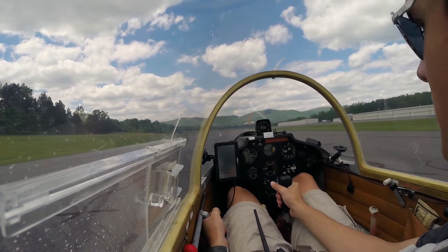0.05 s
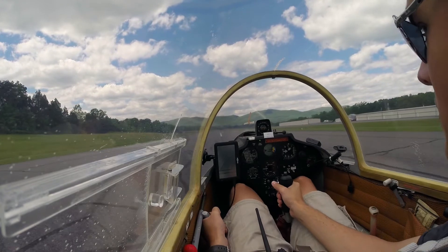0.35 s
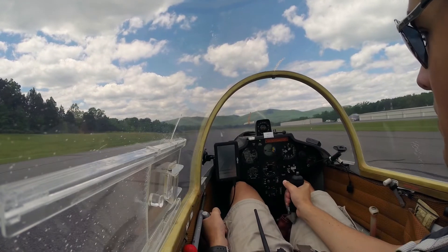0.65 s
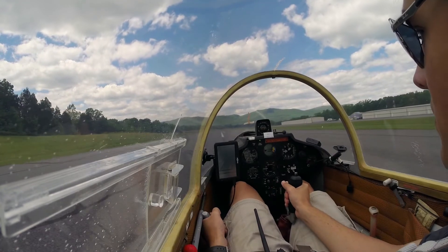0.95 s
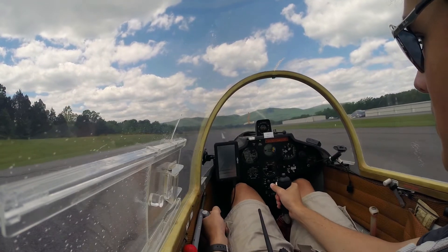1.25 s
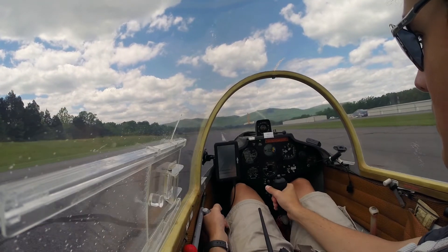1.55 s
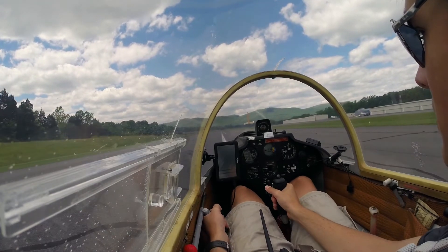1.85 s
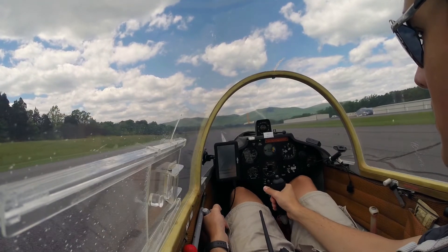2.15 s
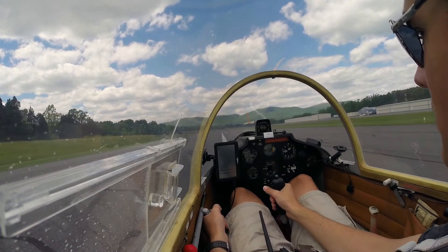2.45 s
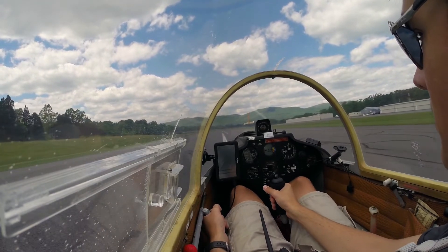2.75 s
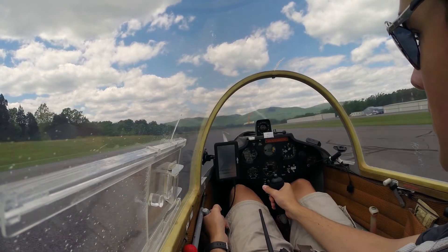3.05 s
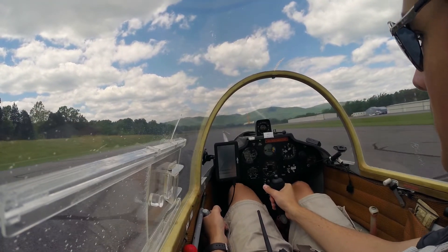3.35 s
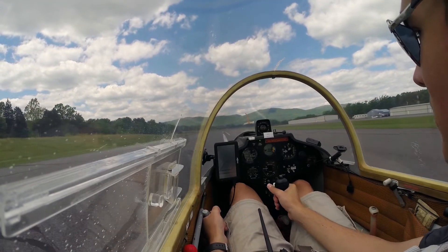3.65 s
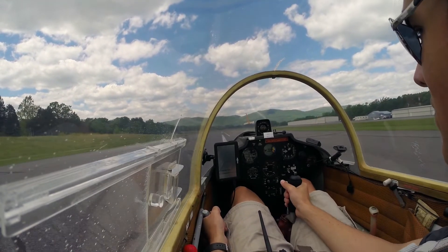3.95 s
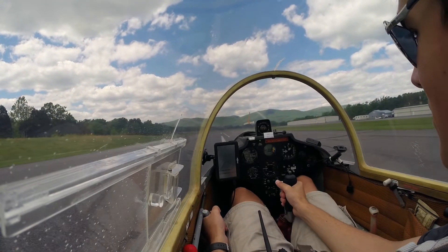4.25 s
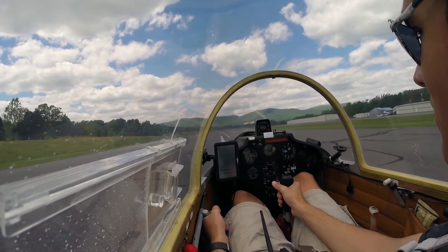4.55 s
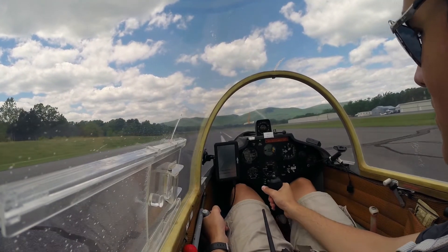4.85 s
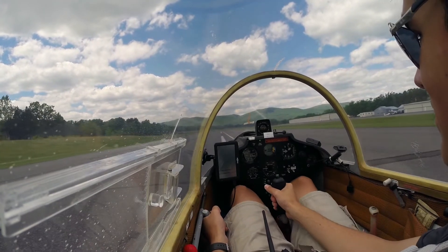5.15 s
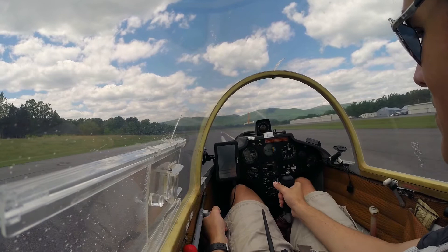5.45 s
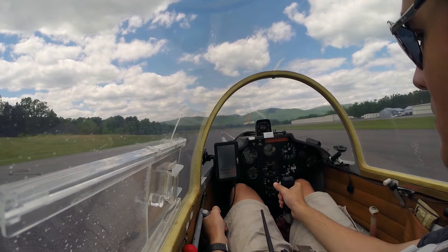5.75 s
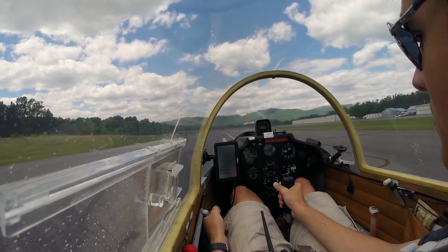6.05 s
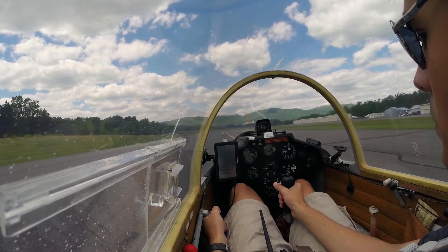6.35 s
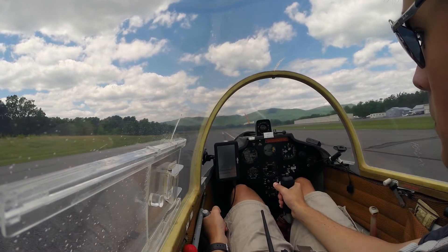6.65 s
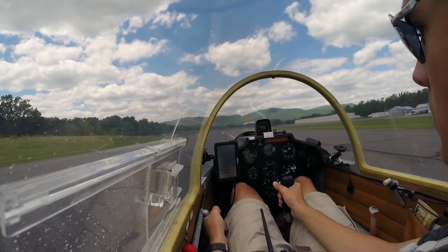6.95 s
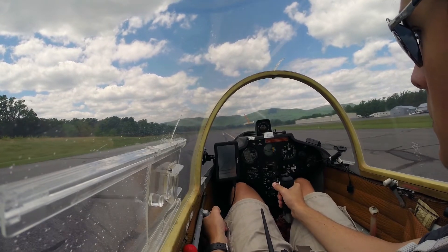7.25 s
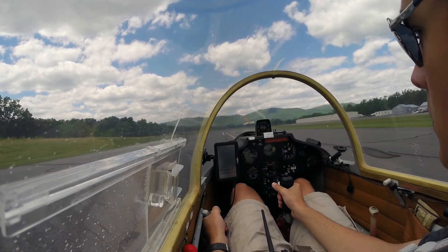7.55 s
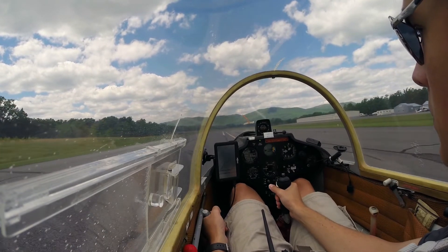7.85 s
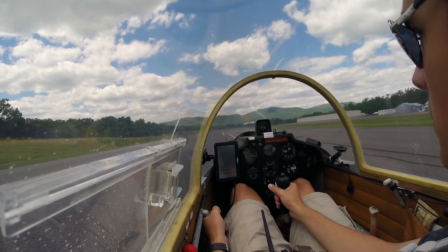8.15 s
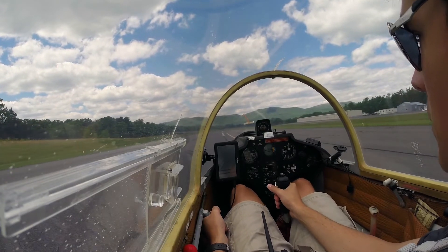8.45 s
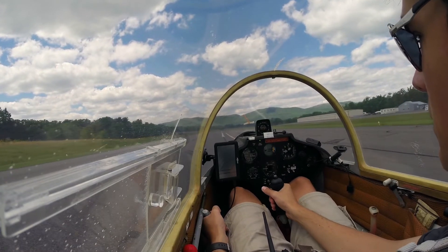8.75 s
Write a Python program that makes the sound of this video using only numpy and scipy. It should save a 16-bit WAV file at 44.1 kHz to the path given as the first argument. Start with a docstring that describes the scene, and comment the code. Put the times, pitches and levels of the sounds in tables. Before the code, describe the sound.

Inside an engineless wooden glider rolling fast on pavement: low rumble, hollow wheel knocks, occasional clacks and a soft rush of air.

```python
"""Inside the cockpit of a wooden glider rolling fast along a paved runway, with no engine.
One microphone under the closed canopy. Close below, the wheel bounces several times a second and
jolts over cracks; under load the grit of the pavement roars through the fuselage's resonances.
All around, the airframe rumbles, groans and booms. Within arm's reach loose fittings clack and snap
and things slide; air hisses past the canopy behind it all. A limiter holds the peaks."""
import sys
import numpy as np
from scipy import signal
from scipy.fft import rfft, irfft, next_fast_len
from scipy.io import wavfile
from scipy.ndimage import uniform_filter1d, minimum_filter1d

SR = 44100
rng = np.random.default_rng(int(sys.argv[2]) if len(sys.argv) > 2 else 0)


def wrap_up_sound(samples):
    """Save the sound to the file named by the first command line argument, as 16-bit audio."""
    columns = np.atleast_2d(samples).T
    # keep every value between -1 and 1, then stretch to whole-number steps
    tamed = np.clip(columns, -1, 1)
    steps = np.round(tamed * 32767).astype(np.int16)
    wavfile.write(sys.argv[1], SR, steps)


N = 396459
FFT_SIZE = 2 * next_fast_len((N + SR // 2) // 2, real=True)

# Levels are relative within each table.
# air flowing past the canopy: (time [s], level [dB])
AIRFLOW = [(0.0, -56.5), (0.45, -60.5), (0.72, -57.5), (1.98, -59), (2.23, -60.5), (2.73, -59.5),
           (3.2, -61.5), (4.55, -59), (5.31, -62), (6.13, -60), (7.9, -61.5), (8.99, -60.5)]
# short gusts through the canopy seams: (middle [s], length [s], rise [dB])
GUSTS = [(.218, .04, 4.5), (.705, .04, 2.5), (1.897, .06, 1.5), (2.016, 0.046, 2), (2.564, 0.033, 5),
         (2.75, .07, 5), (3.27, 0.036, 5), (3.6, .1, 2.5), (4.52, 0.041, 7), (5.538, 0.054, 6.5),
         (5.901, 0.036, 4), (5.97, 0.035, 3), (6.222, .04, 2), (6.322, .05, 4.5), (6.644, 0.033, 6),
         (7.283, 0.043, 2), (7.814, .04, 6), (8.133, .05, 5)]
# colour of the air hiss: (frequency [Hz], level [dB])
AIR_SPECTRUM = [(200, 17.5), (1300, 11), (1700, 9.5), (2200, 5), (2800, 2.5), (3150, 6), (3700, 5.5),
                (4400, -4), (5000, -9.5), (5450, -6.5), (5900, -7.5), (6600, -14), (7800, -22), (9600, -30),
                (12500, -39.5), (15000, -50.5)]

# things sliding in the cockpit: (middle [s], length [s], level [dB], weight of the dull part [dB])
SCUFFS = [(.63, .05, -4, -4), (0.798, .03, -6, 11), (1.147, 0.06, -3.5, 14), (1.243, 0.044, -7, -3),
          (2.02, 0.067, -7.5, 16), (3.263, 0.022, -7, 12), (3.794, 0.037, 4, 5), (3.935, .04, -1, -7),
          (4.046, .06, -2, 8), (4.18, 0.05, -6, 14.5), (4.28, 0.061, -0.5, 8), (4.435, 0.031, 0, 6),
          (4.504, .06, -9, 11), (4.586, 0.044, 0.5, 11.5), (5.188, 0.039, 2.5, -4), (5.23, 0.027, 2, -2),
          (5.485, 0.032, -7.5, 15), (6.002, 0.029, -3, 0)]
# bright part of a scuff: (frequency [Hz], level [dB])
SCUFF_SPECTRUM = [(1500, -108), (3500, -99.5), (5000, -99), (6200, -90.5), (7600, -100), (8700, -103),
                  (9500, -112), (14000, -128)]
# loose fittings knocking:
# (time [s], level [dB], weight of the dull part [dB], t60 [s], ring pitch [Hz], ring level [dB])
CLACKS = [(0.5786, -43.5, -4, 0.12, 5400, 0), (0.655, -44, -5, .061, 7600, -4.5),
          (0.788, -54, 16.5, 0.056, 3300, 1), (1.086, -48, -5, .05, 7430, 2),
          (1.1947, -50, -7, .1, 7400, 0), (1.219, -52, -4, .05, 9000, 2), (1.4631, -49, 0, .08, 7500, -3),
          (1.52, -50, 0, .05, 8500, 0), (1.596, -47, -9, 0.087, 7500, -4),
          (1.707, -46.5, 2.5, .075, 7000, 3), (1.922, -49, -2, .05, 8500, -3),
          (2.678, -50, -6, .06, 7400, -2), (2.906, -51, -1, .06, 7200, 4), (3.378, -48, -1, .07, 5700, 4),
          (3.578, -52, -2, .05, 7500, 0), (3.715, -50, -10, .08, 12500, 3),
          (3.7586, -46.5, -3, 0.11, 12800, 10), (3.806, -47, -6, .07, 7600, 3),
          (3.874, -52, -4, .05, 7970, 0), (3.94, -55, -6, .05, 7400, 1), (4.016, -51, 10, .062, 5900, 14),
          (4.0766, -34.5, 1.5, .062, 7300, 1), (4.088, -46, 9.5, 0.11, 3300, 10),
          (4.14, -54, 2, .05, 7500, 0), (4.2604, -48, 13, .09, 5300, 20), (4.2744, -56, 8, .08, 5230, 10),
          (4.308, -35.5, 4, 0.097, 7400, -3), (4.3354, -46, 2, 0.089, 12500, -1),
          (4.424, -54, 5, .07, 7600, 6), (4.483, -57, -4, .06, 8000, 0),
          (4.6964, -31.5, -1, .082, 4650, -10), (4.7856, -49.5, 5, 0.18, 5300, 8),
          (4.89, -39.5, 1, .08, 5800, 2), (5.2639, -52, 3, .072, 5700, 2), (5.386, -45, 4, .072, 5300, 7),
          (6.35, -49, -5.5, .065, 7300, -3.5), (7.7907, -49.5, 2, 0.29, 5560, -3),
          (8.3694, -50.5, 3, 0.27, 5700, 3), (8.427, -50, 1, 0.066, 10500, 1),
          (8.719, -54, -1, .05, 8000, -6)]
# bright part of a clack: (frequency [Hz], level [dB])
CLACK_SPECTRUM = [(500, -18), (2000, -4), (4800, -4), (6200, -6), (8400, -7), (9600, -14), (10500, -18),
                  (12500, -27), (15000, -44)]
# dull part of a clack or scuff: (frequency [Hz], level [dB])
DULL_SPECTRUM = [(200, 7.5), (1000, 18), (1900, 11.5), (2750, 4.5), (3400, 9), (4000, 6), (5000, -13),
                 (9000, -54), (15000, -57)]
# high ring that the fittings share: (frequency [Hz], width [Hz], level [dB])
FITTING_MODES = [(6350, 220, -2.5), (7400, 200, -3), (12400, 450, -20)]
# ring of the canopy they knock on: (frequency [Hz], width [Hz], level [dB])
CANOPY_MODES = [(2070, 35, 4), (2470, 43, 9), (3300, 240, 14), (3670, 120, 10.5)]
# a hard metal fitting hits its stop: (time [s], level [dB], t60 [s])
SNAPS = [(1.334, -4, 0.1), (5.1317, 1, .09), (8.442, -2, 0.072)]
# body of a snap: (frequency [Hz], level [dB])
SNAP_SPECTRUM = [(300, -53), (1100, -50.5), (1600, -58), (2300, -64.5), (3300, -64), (4200, -67),
                 (5000, -71), (6000, -73), (8400, -78), (9500, -85), (10700, -84), (11700, -92),
                 (13000, -91), (15000, -103)]
# ring of a snap: (frequency [Hz], width [Hz], level [dB])
SNAP_MODES = [(3450, 450, -64), (5350, 340, -67.5), (8500, 250, -78), (12400, 300, -89)]

# shaking of the airframe: (frequency [Hz], level [dB])
SHAKE_SPECTRUM = [(10, -60.5), (24, -55), (42, -55.5), (75, -73.5), (130, -64.5), (450, -50.5),
                  (800, -63.5), (1500, -73), (3000, -110), (9000, -150)]
# low airframe resonances: (frequency [Hz], width [Hz], level [dB])
FRAME_MODES = [(57.8, 10, -48), (143.6, 26, -46), (167.8, 20, -46), (238, 19, -50.5), (314.7, 41, -45.5),
               (355, 50, -46.5)]
# resonance of the cockpit's air cavity: (frequency [Hz], width [Hz], level [dB])
BOOM_MODE = [(106.8, 10, -35.5)]
# the cavity booms: (middle [s], length [s], level [dB], pitch [Hz])
BOOMS = [(1.121, 0.16, 0, 104.5), (2.231, 0.097, 1.5, 100.5), (2.479, 0.068, 5, 104),
         (2.722, 0.11, 1.5, 98.3), (3.156, 0.1, 3, 98), (3.503, 0.097, 0, 107), (3.811, 0.062, 3, 103),
         (4.07, 0.18, 0, 104), (4.3, 0.038, 1, 107), (4.699, 0.098, -2, 104.3), (5.72, 0.079, 5, 104),
         (5.993, 0.051, 5, 103), (6.168, 0.075, 7.5, 102.5), (7.18, 0.12, 6.5, 111.4),
         (7.722, 0.13, -1.5, 102.7), (8.336, 0.072, 11, 108), (8.802, 0.12, 2.5, 103.3)]
# the boom between its swells: (time [s], level [dB])
BOOM_REST = [(0, -3.5), (.8, -5.5), (1.5, -2.5), (2.7, -1), (2.95, -11), (4.2, -3), (4.95, -6), (5.3, -3),
             (6.3, -1.5), (6.9, -3.5), (7.5, -3), (8.0, -4), (8.99, -3.5)]
# resonances of the flexing airframe: (frequency [Hz], width [Hz], level [dB])
GROAN_MODES = [(229.5, 26.5, -47), (249.9, 21.7, -42.5), (305, 34, -53)]
# the airframe groans: (middle [s], length [s], level [dB], pitch [Hz])
GROANS = [(0.887, 0.08, 2.5, 230), (1.12, 0.049, 11, 254), (1.208, 0.036, 13, 247), (1.867, 0.05, 2, 247),
          (2.143, 0.071, 5.5, 240.4), (2.303, 0.061, 4, 257), (2.516, 0.1, 9.5, 253.7),
          (3.28, 0.13, 2.5, 217.5), (3.555, 0.18, 1.5, 253.4), (5.957, 0.16, 0.5, 231),
          (7.109, 0.044, 8, 253), (7.77, 0.037, 3.5, 250), (8.948, 0.096, 5.5, 262)]
# the groan between its swells: (time [s], level [dB])
GROAN_REST = [(0, -2), (.55, -4), (.9, 1), (2.9, 1.5), (3.6, 3.5), (3.88, -3), (4.05, 3), (4.72, -5.5),
              (4.9, 2), (6.1, -0.5), (6.4, -2.5), (7.3, 0), (8.2, 0.5), (8.75, -7)]

# the wheel slaps down or crosses a crack: (time [s], level [dB])
JOLTS = [(0.177, -6), (0.615, -2), (0.8725, -1), (1.269, -5), (1.454, 1), (1.880, -3), (2.921, -2),
         (3.494, -7), (3.778, -3), (4.014, -2), (4.444, 0), (4.857, -5), (5.145, -2), (5.272, -5),
         (5.746, -2), (6.02, 2), (6.197, -4), (7.656, 0), (7.731, -3), (7.889, 0)]
# short ring of the wheel box: (frequency [Hz], width [Hz], level [dB])
WHEEL_BOX_MODES = [(450, 100, -42), (620, 140, -45), (1150, 300, -60)]
# the wheel comes down and presses on the pavement: (start [s], time under load [s], load [dB])
BOUNCES = [(-0.01, 0.067, 5), (0.168, 0.056, 1), (0.299, 0.041, -1), (0.354, 0.11, 1), (.55, 0.066, -2),
           (.607, 0.057, 1.5), (0.688, 0.047, 3.5), (0.842, 0.064, 4), (1.011, 0.079, 4), (1.085, 0.067, 0),
           (1.253, 0.06, 5), (1.419, 0.048, 6), (1.595, 0.039, 2), (1.701, 0.052, 2.5), (1.864, 0.076, -1),
           (2.044, 0.052, 1.5), (2.215, 0.088, 0), (2.404, 0.045, .5), (2.52, 0.074, -0.5),
           (2.79, 0.035, 0.5), (2.91, 0.054, -3), (3.065, 0.05, -1), (3.175, 0.042, -1), (3.255, 0.031, -1),
           (3.305, 0.032, 2), (3.49, 0.072, 0.5), (3.55, 0.036, 0), (3.771, 0.068, 2), (4.002, 0.083, 3.5),
           (4.252, 0.061, 3.5), (4.436, 0.099, 0.5), (4.625, 0.074, 2.5), (4.785, 0.043, -2),
           (4.852, 0.16, 0.5), (4.974, 0.092, 0), (5.13, 0.07, -0.5), (5.23, 0.024, 2.5), (5.459, 0.21, 1),
           (5.75, 0.12, -1), (5.88, 0.17, 1.5), (6.085, 0.15, 2.5), (6.303, 0.037, 4), (6.458, 0.078, 0),
           (6.606, 0.11, 0.5), (6.738, 0.026, 5), (6.84, 0.049, 0), (6.916, 0.092, 1), (7.03, 0.066, 0),
           (7.185, 0.22, 2), (7.37, 0.05, 0), (7.475, 0.068, 2.5), (7.605, 0.083, 4.5), (7.725, 0.12, 1.5),
           (8.02, 0.14, 1.5), (8.195, 0.11, 1), (8.37, 0.06, 0), (8.419, 0.021, 5.5), (8.645, 0.083, 3.5),
           (8.92, 0.093, 0)]
# light load on the wheel between bounces: (time [s], load [dB])
ROLLING_LOAD = [(0, -12), (.8, -8.5), (1.2, -8.5), (1.6, -2), (2.0, -11), (2.35, -7), (2.7, -1.5),
                (3.0, -9.5), (3.35, -7), (3.68, -20), (4.3, -13), (4.75, -12.5), (5.3, -5.5), (6.0, -3),
                (6.4, -9), (7.12, -4), (7.4, -1), (7.97, -4.5), (8.2, -4), (8.5, -3.5), (8.99, -3)]
# hollow resonances of the fuselage: (frequency [Hz], width [Hz], level [dB])
SHELL_MODES = [(339, 47, -47), (373, 17.5, -39), (402, 22.2, -39.5), (483.6, 15.9, -40)]
# hollow knocks of the wheel in the fuselage: (middle [s], length [s], level [dB], pitch [Hz])
KNOCKS = [(0.212, 0.044, 6.5, 372.5), (0.436, 0.036, 7, 391), (0.584, 0.032, 6.5, 355),
          (0.742, 0.029, 6.5, 385), (0.884, 0.041, 5.5, 374), (1.041, 0.046, -4, 371),
          (1.31, 0.068, -2, 387), (1.631, 0.047, 7, 373), (1.828, 0.018, 5.5, 375), (1.891, 0.03, 8.5, 362),
          (2.269, 0.057, 4.5, 366), (2.437, 0.042, 0.5, 398), (2.543, 0.033, 7.5, 362),
          (2.821, 0.076, 1.5, 386), (2.935, 0.03, 8, 364), (3.189, .045, 3, 363), (3.306, 0.086, 3, 399.4),
          (3.789, 0.024, 7, 393), (4.328, 0.059, 6, 373.5), (4.502, 0.018, 5.5, 360),
          (4.683, 0.058, 6.5, 380), (4.865, 0.021, 6, 370), (4.906, 0.021, 7, 390), (5.157, 0.02, 5, 360),
          (5.274, 0.02, 9.5, 378), (5.308, 0.013, 10, 368), (5.42, 0.019, 6, 366), (5.471, 0.028, 5, 372),
          (5.64, 0.039, 5.5, 379.5), (5.904, 0.029, 5.5, 387), (6.151, .028, 2, 370),
          (6.21, .055, 3.5, 384), (6.341, 0.033, 7.5, 371), (6.485, 0.028, 4, 384),
          (6.645, 0.026, 7.5, 377), (6.867, .03, 4.5, 375), (6.992, 0.07, 6.5, 373), (7.217, 0.033, 1, 403),
          (7.496, 0.027, 2, 375), (7.668, 0.069, 1.5, 414), (7.824, 0.037, 6.5, 377),
          (7.903, 0.029, 5.5, 380), (8.115, 0.095, 3, 375.6), (8.203, 0.038, 0.5, 350),
          (8.447, 0.037, 6, 368), (8.618, 0.026, 4.5, 388), (8.71, 0.021, 4.5, 398)]
# broad roar of the tyre: (frequency [Hz], level [dB])
TYRE_SPECTRUM = [(40, -82.5), (150, -47), (300, -54.5), (600, -69.5), (1000, -64), (1600, -72.5),
                 (2300, -95.5), (3400, -88), (4800, -102), (5400, -104), (8000, -115), (13000, -136)]
# resonances of the fuselage's skin panels: (frequency [Hz], width [Hz], level [dB])
PANEL_MODES = [(600, 61, -46), (638, 34, -47), (696, 19, -46), (790, 41, -58.5), (865, 27, -49.5),
               (917, 76, -58), (1040, 25, -57), (1044, 30, -54.5), (1213, 22.5, -53.5), (1304, 73, -70.5),
               (1375, 12, -67.5), (1483, 44, -64.5), (1620, 30, -73.5), (1680, 4.1, -61), (1830, 27, -85),
               (1821, 24, -71.5), (1932, 49, -72.5), (2100, 10, -71.5), (2380, 24, -83.5), (2544, 33, -79)]


def from_db(db):
    """Decibels to gain."""
    return 10 ** (np.asarray(db) / 20)


def rms_one(x):
    """Scale to unit rms."""
    return x / np.sqrt(np.mean(x ** 2) + 1e-20)


def in_time(rows):
    """A control curve at every sample."""
    return np.interp(np.arange(N) / SR, *np.transpose(rows))


def bump(middle_s, length_s):
    """A bell-shaped rise and fall with peak 1."""
    t = np.arange(N) / SR
    return np.exp(-np.minimum((2 * (t - middle_s) / length_s) ** 2, 50))


def white():
    """Noise with unit power per Hz."""
    return rng.standard_normal(N) * np.sqrt(SR / 2)


def drift(rate_hz):
    """Random wander with unit rms, mostly slower than rate_hz."""
    hz = np.arange(N // 2 + 1) * SR / N
    return rms_one(irfft(rfft(rng.standard_normal(N)) / (1 + (hz / rate_hz) ** 2), N))


def grains(per_s, spread_db):
    """Random tiny impacts of uneven size, with unit power per Hz."""
    sizes = from_db(spread_db * np.minimum(rng.exponential(1, N), 4)) * rng.choice([-1, 1], N)
    hits = rng.random(N) < per_s / SR
    return rms_one(sizes * hits) * np.sqrt(SR / 2)


def body(x, spectrum=(), modes=()):
    """Pass x through a resonant body: a broad spectrum plus ringing modes."""
    hz = np.maximum(np.arange(FFT_SIZE // 2 + 1) * SR / FFT_SIZE, 1)
    power = np.full(len(hz), 1e-16)
    if len(spectrum):
        corner_hz, db = np.transpose(spectrum)
        power += from_db(np.interp(np.log(hz), np.log(corner_hz), db)) ** 2
    for centre, width, db in modes:
        detune = (hz - centre) / width
        skirt = 1 + (detune / 1.24) ** 2  # keeps each mode to its own neighbourhood
        power += from_db(db) ** 2 / (1 + (2 * detune) ** 2) / skirt
    # minimum phase: things ring after a blow, never before it
    cepstrum = irfft(np.log(power) / 2, FFT_SIZE)
    cepstrum[1:FFT_SIZE // 2] *= 2
    cepstrum[FFT_SIZE // 2 + 1:] = 0
    return irfft(rfft(x, FFT_SIZE) * np.exp(rfft(cepstrum)), FFT_SIZE)[:N]


def steadied(x, seconds):
    """Even out slow chance swells so that the driving force sets the level."""
    window = int(seconds * SR)
    power = uniform_filter1d(uniform_filter1d(x ** 2, window), window)
    return x * np.sqrt(np.mean(x ** 2) / (power + 1e-12))


def swells(x, rows, rest_db, wander_db, waver_hz, pure_share, takeover=0.6):
    """A resonance wanders around a resting level; in each swell one wavering note takes over."""
    t = np.arange(N) / SR
    rest_power = from_db(rest_db + wander_db * drift(rate_hz=31.0)) ** 2
    waver_cycles = np.cumsum(waver_hz * drift(rate_hz=5.08)) / SR
    swell_power, tone = np.zeros(N), np.zeros(N)
    for middle, length, db, hz in rows:
        span = slice(max(int((middle - 2 * length) * SR), 0), int((middle + 2 * length) * SR))
        age = t[span] - middle
        power = from_db(db) ** 2 * np.exp(-(2 * age / length) ** 2)
        phase = 2 * np.pi * (hz * age + waver_cycles[span])
        swell_power[span] += power
        tone[span] += np.sqrt(2 * pure_share * power) * np.sin(phase)
    ducked_power = rest_power ** 2 / (rest_power + takeover * swell_power)
    return x * np.sqrt(ducked_power + (1 - pure_share) * swell_power) + tone * np.std(x)


def air(load_db, gain_db=-29.5, steady=0.57, flicker_db=-4, split_hz=4600):
    """Two leaks at the canopy seams, one lower and one higher: a background hiss with small gusts."""
    gust_db = sum(db * bump(middle, length) for middle, length, db in GUSTS)
    flow = from_db(in_time(AIRFLOW) + gust_db + gain_db + 0.05 * load_db)
    leaks = np.zeros(N)
    for side in ("low", "high"):
        leak = signal.sosfilt(signal.butter(4, split_hz, side, fs=SR, output="sos"), white())
        flicker = from_db(flicker_db + 2.8 * drift(rate_hz=16))
        leaks += leak * np.hypot(steady, flicker)
    return body(leaks * flow, AIR_SPECTRUM)


def scuffs(dull_db=-98):
    """Things slide nearby in short swells of friction grains; the heavier ones buzz in the canopy."""
    bright, dull = np.zeros(N), np.zeros(N)
    for middle, length, db, weight_db in SCUFFS:
        rub = from_db(db) * bump(middle, length)
        bright += rub
        dull += rub * from_db(weight_db + dull_db)
    friction = grains(per_s=1400, spread_db=0.5)
    return body(friction * bright, SCUFF_SPECTRUM) + body(friction * dull, DULL_SPECTRUM, CANOPY_MODES)


def canopy(x, echo_db=-11, t60_s=0.062):
    """Dense, quickly dying reflections close around the microphone: the colour of a small enclosure."""
    age = np.arange(SR // 10) / SR
    echoes = rng.standard_normal(len(age)) * from_db(-60 * age / t60_s)
    echoes *= from_db(echo_db) / np.linalg.norm(echoes)
    echoes[0] = 1  # the direct sound
    return signal.fftconvolve(x, echoes / np.linalg.norm(echoes))[:N]


def ticks(load_db, gain_db=-115, t60_s=0.05):
    """Faint random ticks of the fittings, louder where the wheel bounces deeper."""
    age = np.arange(SR // 4) / SR
    mean_load_db = uniform_filter1d(load_db, SR // 2)
    swing_db = np.sqrt(uniform_filter1d((load_db - mean_load_db) ** 2, SR // 2) + 1e-9)
    taps = grains(per_s=18, spread_db=3.0) * from_db(gain_db + 1.5 * np.minimum(swing_db, 5))
    tail = rng.standard_normal(len(age)) * from_db(-60 * age / t60_s)
    return signal.fftconvolve(taps, tail / np.linalg.norm(tail))[:N]


def fittings(load_db, gain_db=-43, ring_width_hz=550):
    """Loose fittings tick and clack on the canopy; a clack is a crack and a dying, ringing chatter."""
    bright, dull = np.zeros(N), np.zeros(N)
    age = np.arange(SR // 4) / SR
    chatter = grains(per_s=13000, spread_db=-0.5)
    crack = 1 + 0.32 * np.exp(-age / 0.0013)
    for start, db, weight_db, t60, ring_hz, ring_db in CLACKS:
        span = slice(int(start * SR), int(start * SR) + len(age))
        burst = chatter[span] * from_db(db + gain_db - 60 * age / t60)
        ring = signal.lfilter(*signal.iirpeak(ring_hz, ring_hz / ring_width_hz, fs=SR), burst)
        bright[span] += burst * crack + ring * from_db(ring_db)
        dull[span] += burst * crack * from_db(weight_db)
    bright += ticks(load_db)
    return body(bright, CLACK_SPECTRUM, FITTING_MODES) + body(dull, DULL_SPECTRUM, CANOPY_MODES)


def snaps():
    """A metal fitting hits its stop close by; a crack and a dense, dying chatter set it ringing."""
    age = np.arange(SR // 4) / SR
    crack = 1 + 0.45 * np.exp(-age / 0.0015)
    force = np.zeros(N)
    for start, db, t60 in SNAPS:
        force[int(start * SR):int(start * SR) + len(age)] += from_db(db - 60 * age / t60) * crack
    return body(force * grains(per_s=13000, spread_db=1.0), SNAP_SPECTRUM, SNAP_MODES)


def rumble(load_db):
    """Uneven pavement shakes the whole frame, harder under load."""
    shaking = steadied(body(white(), SHAKE_SPECTRUM, FRAME_MODES), seconds=0.45)
    return shaking * from_db(0.25 * load_db)


def boom(load_db):
    """The cockpit's air cavity booms around the microphone."""
    cavity = steadied(body(white(), modes=BOOM_MODE), seconds=0.065)
    rest_db = in_time(BOOM_REST) + 0.038 * load_db
    return swells(cavity, BOOMS, rest_db, wander_db=2, waver_hz=3.05, pure_share=0.5)


def groan(load_db):
    """The wooden airframe flexes and groans."""
    flexing = steadied(body(white(), modes=GROAN_MODES), seconds=0.11)
    rest_db = in_time(GROAN_REST) + 0.068 * load_db
    return swells(flexing, GROANS, rest_db, wander_db=1.5, waver_hz=3.5, pure_share=0.8)


def jolts(gain_db=-19, contact_s=0.00014):
    """Each hard push on the axle leaves the wheel box ringing for a few cycles."""
    age = np.arange(SR // 100) / SR
    push = age / contact_s ** 2 * np.exp(-age / contact_s)
    blows = np.zeros(N)
    for start, db in JOLTS:
        blows[int(start * SR):int(start * SR) + len(age)] += push * from_db(db + gain_db)
    return body(blows, modes=WHEEL_BOX_MODES)


def wheel_load(squash_s=0.01, sag_db_per_s=4, rebound_db_per_s=225, cushion_s=0.026):
    """Load in dB: each bounce squashes the tyre, sags a little and lets go, back to light rolling."""
    t = np.arange(N) / SR
    load = from_db(in_time(ROLLING_LOAD))
    for start, length, db in BOUNCES:
        span = slice(max(int(start * SR), 0), int((start + length) * SR) + SR // 4)
        age = t[span] - start
        fall_db = sag_db_per_s * age + rebound_db_per_s * np.maximum(age - length, 0)
        press = np.clip(age / squash_s, 0, 1) * from_db(db - fall_db)
        load[span] = np.maximum(load[span], press)
    # the soft tyre rounds off every change of load
    return 20 * np.log10(uniform_filter1d(load, int(cushion_s * SR)))


def wheel(load_db, shell_lag_s=0.0058, stiffening_db=-9):
    """Grit under the tyre, close below, drives the fuselage; more load, a louder and brighter roar."""
    t = np.arange(N) / SR
    grit = grains(per_s=1500, spread_db=1.0)
    # the fuselage takes a moment to ring up and to die away
    late_load_db = np.interp(t - shell_lag_s, t, load_db)
    rest_db = 0.8 * late_load_db - 2
    shell = steadied(body(grit, modes=SHELL_MODES), seconds=0.029)
    hollow = swells(shell, KNOCKS, rest_db, wander_db=3, waver_hz=5, pure_share=0.63)
    roar = steadied(body(grit, TYRE_SPECTRUM, PANEL_MODES), seconds=0.034) * from_db(load_db - 2.5)
    # a squashed tyre is stiffer and passes on more of the treble
    treble = signal.sosfiltfilt(signal.butter(2, 900, "high", fs=SR, output="sos"), roar)
    roar += treble * from_db(stiffening_db + np.minimum(load_db, 6))
    flutter = drift(rate_hz=32)  # from the texture of the pavement
    return hollow * from_db(1.3 * flutter) + roar * from_db(1.7 * flutter)


def scene():
    """Everything as it reaches the one microphone in the cockpit."""
    load_db = wheel_load()
    undercarriage = wheel(load_db) + jolts()
    airframe = rumble(load_db) + boom(load_db) + groan(load_db)
    background = canopy(air(load_db) + scuffs())
    rattles = fittings(load_db) + snaps()
    return (undercarriage + airframe + background + rattles)[None]


def record(dry, ceiling=0.56, release_db_per_s=200, cutoff_hz=15000):
    """After the microphone a look-ahead limiter holds the peaks and a low-pass cuts the top."""
    over_db = 20 * np.log10(np.maximum(np.abs(dry[0]) / ceiling, 1))
    release_db = release_db_per_s * np.arange(N) / SR
    held_db = np.maximum.accumulate(over_db + release_db) - release_db
    # the gain eases down just ahead of each peak
    gain = uniform_filter1d(minimum_filter1d(from_db(-held_db), size=129), size=129)
    return signal.sosfilt(signal.cheby2(14, 60, cutoff_hz, fs=SR, output="sos"), dry * gain)


dry = scene()
out = record(dry)
wrap_up_sound(out)
```